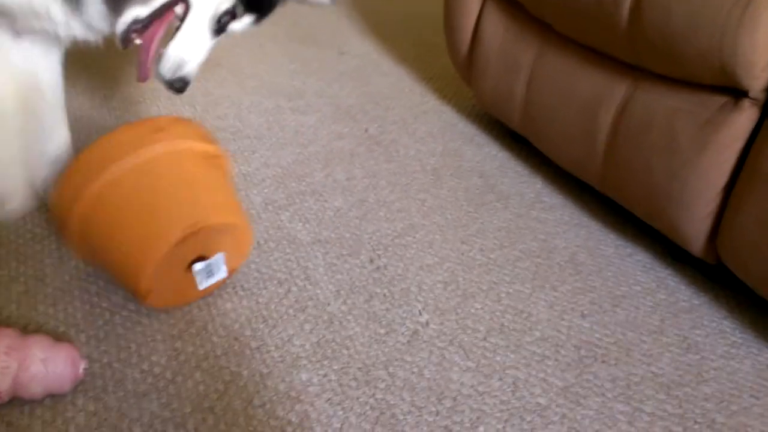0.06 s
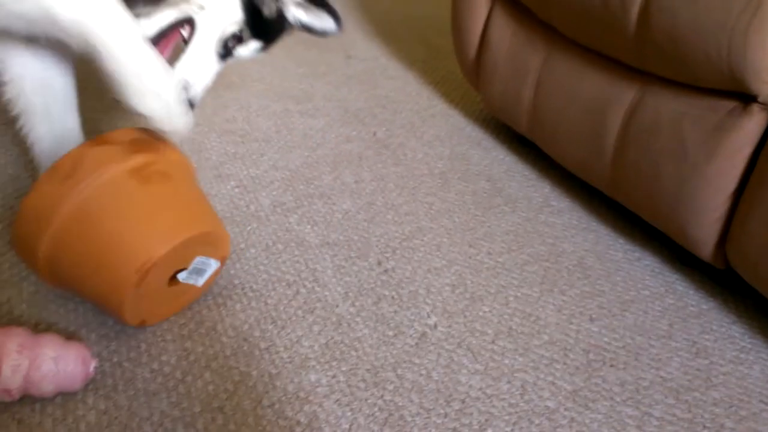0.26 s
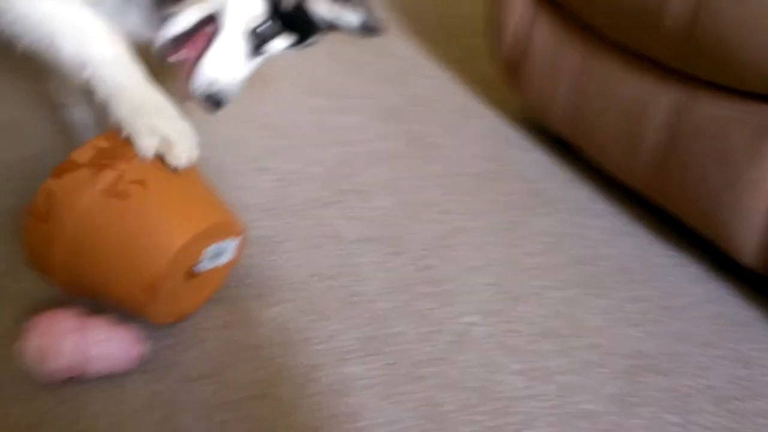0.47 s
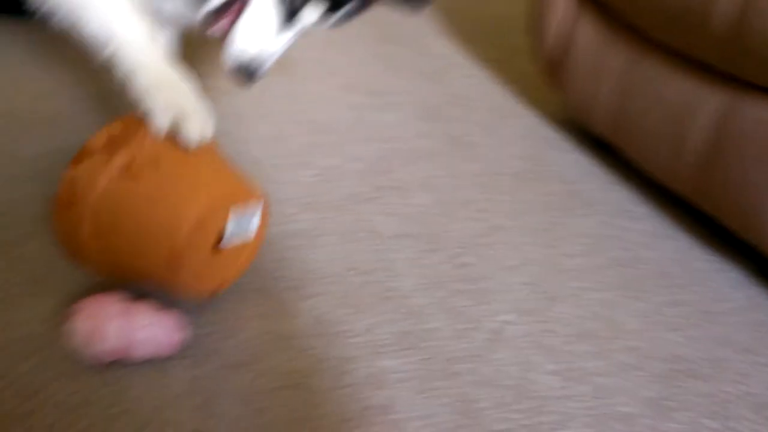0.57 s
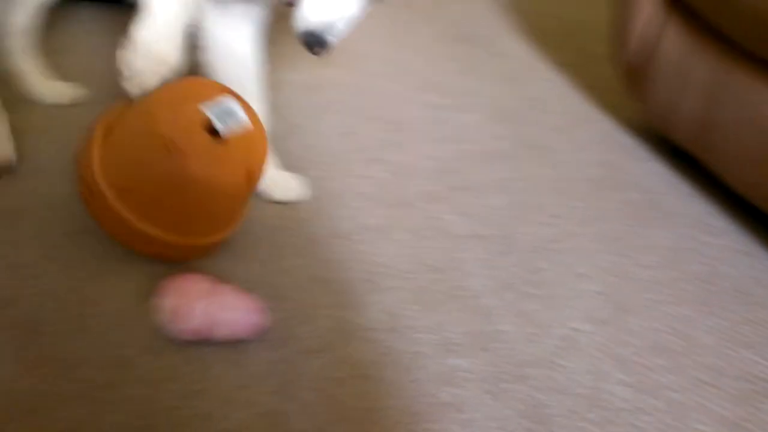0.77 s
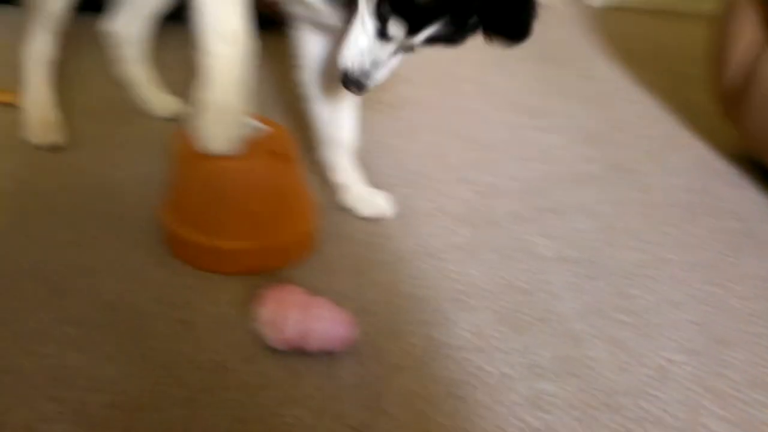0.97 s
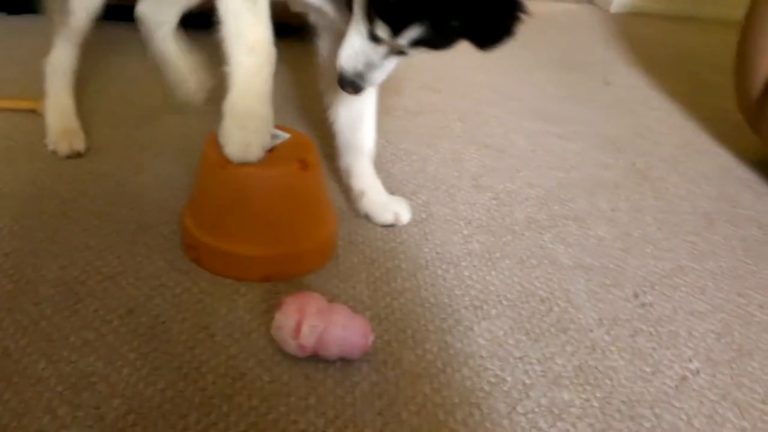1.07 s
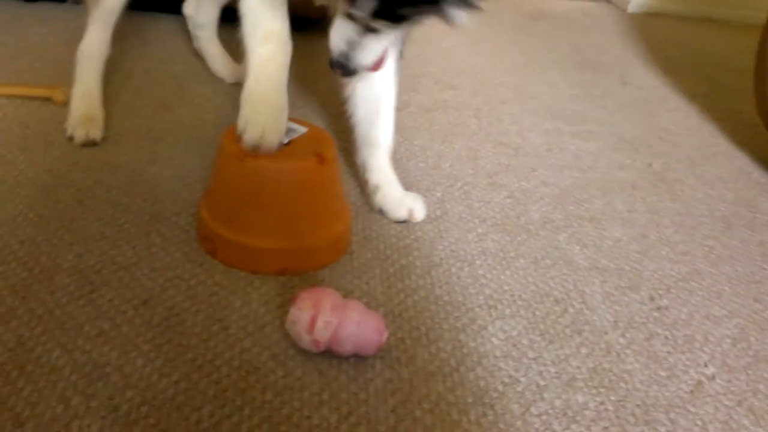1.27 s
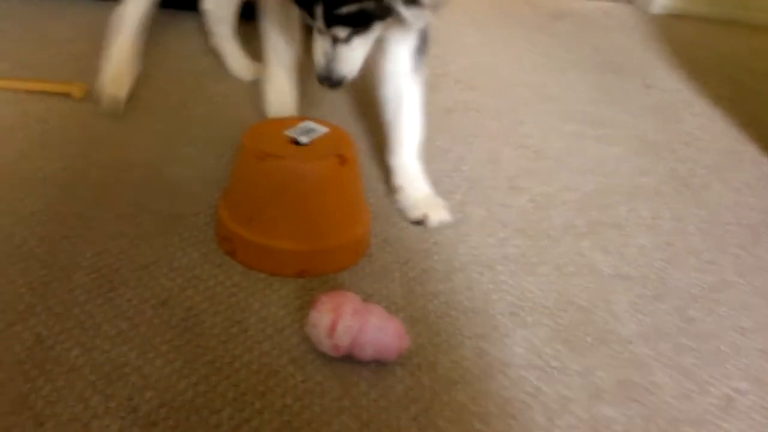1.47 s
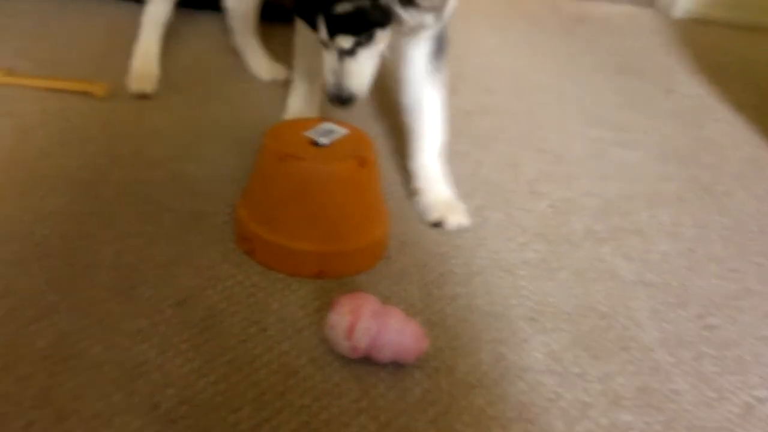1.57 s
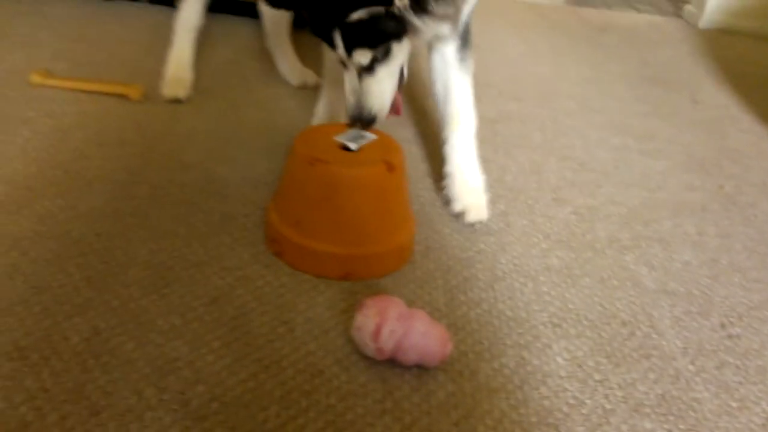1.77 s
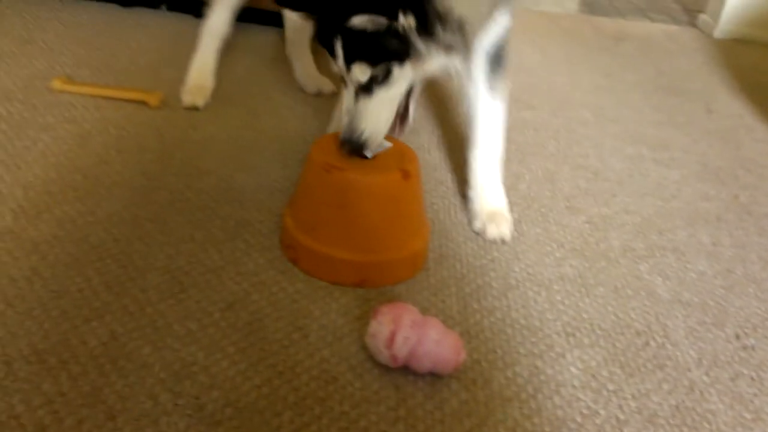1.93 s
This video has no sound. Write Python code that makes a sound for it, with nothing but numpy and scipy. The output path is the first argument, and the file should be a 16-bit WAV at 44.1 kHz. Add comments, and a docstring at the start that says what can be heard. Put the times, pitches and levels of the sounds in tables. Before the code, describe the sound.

Sharp clinks and gritty scrapes come from a terracotta pot as a dog paws it around a carpeted living room. The pot rolls with a faint hollow rumble, thuds onto its rim, then takes one more scratch and slides.

```python
"""Living room: a dog paws a terracotta flowerpot across the carpet.
Claws click and scrape (stick-slip) on the clay, which rings briefly. The pile hisses against
the pot and drives a hollow rumble as it rolls. The pot drops onto its rim with a thud and is
scratched once more. Low room noise with faint hums lies underneath."""
import sys
import numpy as np
from scipy import signal
from scipy.fft import rfft, irfft, next_fast_len
from scipy.io import wavfile
from scipy.ndimage import uniform_filter1d

SR = 44100
rng = np.random.default_rng(int(sys.argv[2]) if len(sys.argv) > 2 else 0)


def to_wav(s):
    """Save 16-bit WAV."""
    ch = np.atleast_2d(s).T  # columns
    pcm = np.round(np.clip(ch, -1, 1) * 32767)  # PCM
    wavfile.write(sys.argv[1], SR, pcm.astype(np.int16))


N = 88200
T = np.arange(N) / SR
RING_T = T[:SR // 2]
LANDS_S = 0.9415   # pot on its side before, on its rim after


def from_db(db):
    """Decibels to gain."""
    return 10 ** (np.asarray(db) / 20)


def unit_energy(x):
    """Scale to a mean energy of 1 per channel."""
    return x / np.sqrt(np.mean(np.sum(x ** 2, axis=-1)) + 1e-20)


def unit_rms(x):
    """Scale to an rms of 1."""
    return x / np.sqrt(np.mean(x ** 2) + 1e-20)


def decay(t60_s):
    """Exponential decay over RING_T."""
    return np.exp(-np.log(1000) * RING_T / t60_s)


def at_hz(points, hz):
    """Read a table on a log-frequency axis."""
    f, value = np.transpose(points)
    return np.interp(np.log(np.maximum(hz, 1)), np.log(f), value)


def coloured(x, points):
    """Minimum-phase filter through points of f/Hz, level/dB."""
    n = x.shape[-1]
    size = 2 * next_fast_len(n)
    gain = from_db(at_hz(points, np.fft.rfftfreq(size, 1 / SR)))
    cepstrum = irfft(np.log(gain))
    cepstrum[1:size // 2] *= 2
    cepstrum[size // 2 + 1:] = 0
    return irfft(rfft(x, size) * np.exp(rfft(cepstrum)))[..., :n]


def stereo_pair(mid, side, correlation):
    """Left and right from two independent noises."""
    return np.sqrt(1 + correlation) * mid + np.sqrt(1 - correlation) * side * np.array([[1], [-1]])


def pan_gains(db):
    """Gains for a left-minus-right level."""
    return from_db(np.array([[db], [-db]]) / 2)


def stereo_noise(spectrum):
    """Shaped noise of rms 1, mono at 100-300 Hz."""
    # left-right likeness: f/Hz, correlation
    likeness = [(30, 0.42), (100, 1), (300, 1), (700, 0.81), (1500, 0.37), (8000, 0.64)]
    hz = np.fft.rfftfreq(N, 1 / SR)
    white = stereo_pair(*rfft(rng.standard_normal((2, N))), at_hz(likeness, hz))
    return unit_rms(irfft(white * from_db(at_hz(spectrum, hz)), N))


def mix_in(out, start_s, x):
    """Add x to out from start_s."""
    i = int(start_s * SR)
    out[..., i:i + x.shape[-1]] += x[..., :max(N - i, 0)]


def room_noise():
    """Low steady noise; faint hums swell and fade."""
    # noise spectrum: f/Hz, level/dB
    spectrum = [(25, -10.5), (60, -39), (120, 1), (250, 2), (400, -2.5), (600, -6.5), (900, -7.5),
                (1400, -15), (2800, -25.5), (5000, -19), (10500, -32.5)]
    # room tones: f/Hz, peak level/dB, peak t/s, 1/e half-width/s
    hums = [(117.3, -55.5, 1.0, 3.7), (562, -53, 1.23, 0.68)]
    hum = 0
    for hz, db, peak_s, width_s in hums:
        tone = np.sqrt(2) * np.sin(2 * np.pi * (hz * T + rng.random()))
        hum += from_db(db) * tone * np.exp(-((T - peak_s) / width_s) ** 2)
    return from_db(-45.5) * stereo_noise(spectrum) + hum


def room_echo(x, t60_s=0.2, delay_s=0.013):
    """Short diffuse echo of a carpeted room."""
    tail = unit_energy(rng.standard_normal((2, len(RING_T))) * decay(t60_s) * (RING_T > delay_s))
    return from_db(-11) * signal.fftconvolve(x.mean(axis=0)[None], tail, axes=1)[:, :N]


def brushing():
    """Soft hiss of the pile against the moving pot."""
    # hiss envelope: t/s, level/dB
    envelope = [(0, -49), (.2, -50.5), (.34, -52), (.5, -46.5), (.66, -47.5), (.82, -45), (.95, -49.5),
                (1.08, -59), (1.27, -67), (1.40, -45.5), (1.50, -46), (1.58, -58), (1.70, -48), (1.80, -54),
                (1.87, -50), (1.93, -59.5), (2.0, -57.5)]
    # hiss spectrum: f/Hz, level/dB
    spectrum = [(300, -15), (550, 3), (900, 0.5), (1300, -12), (1800, -7.5), (3000, -13.5), (5000, -6.5),
                (7000, -18), (10500, -26)]
    return from_db(np.interp(T, *np.transpose(envelope))) * stereo_noise(spectrum)


def rolling():
    """The pile drives the pot's hollow resonances as it rolls and slides."""
    # rumble envelope: t/s, level/dB
    envelope = [(0, -41.5), (.12, -35.5), (.22, -35.5), (.31, -36.5), (.35, -54), (.41, -42), (.45, -35.5),
                (.53, -39.5), (.63, -31), (.70, -50), (.84, -40), (.93, -40.5), (.975, -31), (1.035, -32),
                (1.075, -49), (1.22, -53), (1.29, -52.5), (1.35, -49), (1.50, -39), (1.56, -48),
                (1.615, -44.5), (1.645, -32.5), (1.75, -33), (1.815, -43.5), (1.87, -37.5), (2.0, -50)]
    # hollow resonances: f/Hz, half-width per filter pass/Hz, level on side/dB, level on rim/dB
    resonances = [(122, 31, -13, -12.5), (180.7, 17, -7, -9), (222, 10.7, 0, -3), (249, 5.8, -3.5, -0.5),
                  (279, 55, -8, -11.5)]
    rumble = 0
    for hz, half_width_hz, side_db, rim_db in resonances:
        b, a = signal.iirpeak(hz, hz / (2 * half_width_hz), fs=SR)
        drive = stereo_pair(*rng.standard_normal((2, N + SR // 2)), correlation=0.98)
        band = signal.lfilter(b, a, signal.lfilter(b, a, drive))[:, -N:]
        rumble += unit_rms(band) * from_db(np.where(T < LANDS_S, side_db, rim_db))
    running_rms = np.sqrt(uniform_filter1d(np.mean(rumble ** 2, axis=0), size=SR // 20) + 1e-12)
    return from_db(np.interp(T, *np.transpose(envelope))) * rumble / running_rms


def thud(band_hz=(128.4, 520)):
    """The rim lands on the carpet: soft pushes into the low modes of cavity and floor."""
    # rim contacts: t/s, level/dB, length/s
    contacts = [(0.939, -21.5, 0.0023), (0.949, -12, 0.0034)]
    # cavity and floor modes: f/Hz, level/dB, t60/s
    modes = [(83.5, -14.5, 0.48), (119, -8.5, 0.15), (173.6, -14.5, 0.37), (208.7, -2.5, 0.086),
             (232, -10, 0.14), (325, -3, 0.084), (387, -1.5, 0.037)]
    out = np.zeros(N)
    body = sum(from_db(db) * np.sin(2 * np.pi * hz * RING_T) * decay(t60_s) for hz, db, t60_s in modes)
    for start_s, db, length_s in contacts:
        push = np.sin(np.pi * np.minimum(RING_T / length_s, 1)) ** 2
        mix_in(out, start_s, from_db(db) * signal.fftconvolve(body, push / push.sum())[:len(RING_T)])
    return signal.sosfilt(signal.butter(3, band_hz, "band", fs=SR, output="sos"), out + 1e-18)


def mode_crowd(t60_s):
    """The clay's weak, close modes, as one decaying noise."""
    # crowd spectrum: f/Hz, level/dB
    spectrum = [(800, -16), (1250, -39.5), (1900, -12.5), (2600, -7.5), (3100, -13), (3700, -9.5),
                (4400, 2), (5300, 1.5), (6300, -4), (7300, -0.5), (8100, -8.5), (10500, -15.5)]
    white = stereo_pair(*rng.standard_normal((2, len(RING_T))), correlation=0.58)
    return unit_energy(coloured(white * decay(t60_s), spectrum))


def pot(force, start_s, low_db, top_db, ring_db, favoured_hz):
    """Pot's response to a force: a dry crack, then modes mixed anew at each contact point."""
    # strong modes, f/Hz: (level on side/dB, level on rim/dB)
    modes = {1557: (-6, -4), 1625: (-13, -18), 2150: (-11, -20), 2342: (-22, -5), 2560: (-8, -16),
             2700: (-10, -6), 3325: (-12, -20), 3640: (-4, -14), 3685: (-12, -5), 4285: (-6, -3),
             4413: (-1, 0), 4540: (-7, -2), 4655: (0, -12), 5076: (0, -2), 5245: (-2, -5), 5318: (-1, -2),
             5432: (-7, -2), 5590: (-6, -5), 5786: (-4, -14), 6640: (-17, -4), 7170: (-8, -16),
             7325: (-6, -13), 8330: (-15, -12), 9550: (-24, -13)}
    # mode damping: f/Hz, t60/s
    damping = [(1500, .19), (5000, .17), (10000, .13)]
    modes_db, spread_db, pan_spread_db, favoured_db, crowd_db = -5, 2, 3, -6, -5
    nearest_hz = min(modes, key=lambda hz: abs(hz - favoured_hz))
    ring = 0
    for hz, (side_db, rim_db) in modes.items():
        strength, pan, turn, skew = rng.standard_normal(4)
        phase = np.pi * turn + .5 * skew * np.array([[1], [-1]])
        wave = np.sin(2 * np.pi * hz * RING_T + phase) * decay(at_hz(damping, hz))
        wave = unit_energy(wave * pan_gains(pan_spread_db * pan))
        pose_db = side_db if start_s < LANDS_S else rim_db
        gain = from_db(modes_db + pose_db + spread_db * strength) / 2
        ring += wave * np.hypot(gain, from_db(favoured_db) * (hz == nearest_hz))
    crack = mode_crowd(t60_s=.032)
    ring += from_db(crowd_db) * mode_crowd(t60_s=.19)
    body = crack + from_db(ring_db) * ring
    sound = signal.fftconvolve(body, force[None], axes=1)[:, :len(RING_T)]
    return coloured(sound, [(2700, low_db), (5070, 0), (7770, top_db)])


def stick_slip(envelope, slips_per_s=2200, spread_db=4.5):
    """Uneven force pulses of a claw on gritty clay."""
    n = len(envelope)
    sizes = from_db(spread_db * np.minimum(rng.exponential(1, n), 4)) * rng.choice([-1, 1], n)
    return unit_energy(envelope * sizes * (rng.random(n) < slips_per_s / SR))


def claws():
    """Claws strike and drag over the pot, which lies to the right."""
    # strikes: t/s, level/dB, low/dB, top/dB, ring/dB, build-up/s, f favoured by the spot/Hz
    clinks = [(0.2465, -22, -14, 1, -4, .001, 5318), (0.2555, -17, -37, -0.5, -20, 0.00046, 5590),
              (0.2595, -23, -5.5, 2.5, 4.5, .002, 3685), (0.3888, -14.5, -6, 6, 0, .003, 7325),
              (0.4085, -12, -2.5, -0.5, -2, 0.0075, 5076), (0.4790, -29.5, 9, -2, -7, 0.0031, 2560),
              (0.5470, -30.5, 2.5, -5.5, 6, 0.0067, 4285), (0.6718, -27, 9, -14, 3.5, 0.00086, 2150),
              (0.6851, -14, 7, 0, 6, 0.0016, 7325), (0.6885, -6, -5, -19, -9, .0012, 7170),
              (0.6955, -12, -18, -24, -6, 0.00038, 4413), (0.7178, -2, -5, -15.5, -4.5, .0015, 4655),
              (0.73, -25, -1, -13, 4, 0.00393, 1557), (0.7966, -13.5, -27, -5, -16, .004, 5076),
              (0.815, -23, 4.5, 3, -5, 0.0035, 5076), (0.8440, -17.5, -6, 3, 0.5, 0.0048, 3325),
              (0.8955, -12, -7, -8.5, -11, 0.0056, 5590), (0.947, -11.5, 0, 2, 1.5, .003, 5432),
              (0.951, -6, -14, -8, -2, .002, 4413), (0.9580, -11.5, 3, -12, -0.5, .002, 1557),
              (0.9883, -19, 7.5, -3, -1, .002, 6640), (1.193, -47, 9.5, 10, -17, 0.0022, 4540),
              (1.44, -12, -0.5, -0.5, -5.5, 0.0024, 3685), (1.856, -40.5, 8, 9, -7, .001, 8330)]
    # drags: t/s, length/s, level/dB, low/dB, top/dB, f favoured by the spot/Hz
    scrapes = [(0.23, 0.049, -25, -17, -0.5, 5245), (0.393, 0.046, -15.5, -7, -2, 4413),
               (0.422, 0.100, -28, 1.5, 5.5, 4413), (0.521, 0.067, -31.5, 4, 5, 7325),
               (0.592, 0.13, -29, 3.5, 5.5, 5245), (0.642, 0.041, -26.5, 5.5, 1, 2150),
               (0.708, 0.01, -18.5, -12, 3.5, 7170), (0.728, 0.15, -12.5, -5, -7.5, 4655),
               (0.782, 0.045, -13, -14.5, -7.5, 5076), (0.83, 0.037, -17, -2.5, 2.5, 2700),
               (0.874, 0.053, -18, -3, 1, 4655), (0.975, 0.069, -24, -0.5, 4.5, 4285),
               (1.354, 0.093, -21.5, -2.5, 7, 4540), (1.442, 0.074, -35.5, -7, 7.5, 8330)]
    # pot's stereo balance: f/Hz, left minus right/dB
    balance = [(1500, -1.5), (2800, -7), (5000, -7), (9000, -1)]
    chatter_s, chatter_db = 0.0032, 4   # a claw skips as it lands
    low_cut_hz = 1380   # the wall radiates little below its first mode
    out = np.zeros((2, N))
    for start_s, db, low_db, top_db, ring_db, build_s, favoured_hz in clinks:
        grip = np.minimum(RING_T / build_s, 1) * np.exp(-np.maximum(RING_T - build_s, 0) / chatter_s)
        force = from_db(chatter_db) * stick_slip(grip)
        force[int(build_s * SR / 2)] += 1   # the impact
        clink = pot(unit_energy(force), start_s, low_db, top_db, ring_db, favoured_hz)
        mix_in(out, start_s, from_db(db) * clink)
    for start_s, length_s, db, low_db, top_db, favoured_hz in scrapes:
        stroke = np.interp(RING_T / length_s, [0, 0.34, 1], [0, 1, 0])
        scrape = pot(stick_slip(stroke), start_s, low_db, top_db, ring_db=3, favoured_hz=favoured_hz)
        mix_in(out, start_s, from_db(db) * scrape)
    out = signal.sosfilt(signal.butter(4, low_cut_hz, "high", fs=SR, output="sos"), out + 1e-18)
    left = coloured(out[0], [(hz, db / 2) for hz, db in balance])
    right = coloured(out[1], [(hz, -db / 2) for hz, db in balance])
    return from_db(15.5) * np.array([left, right])


def scene():
    """Claws with their echo, the pot on the carpet, room noise."""
    pawing = claws()
    return pawing + room_echo(pawing) + thud() + rolling() + brushing() + room_noise()


def record(dry):
    """Steep low-pass."""
    cutoff_hz = 10480
    return signal.sosfilt(signal.ellip(12, .2, 75, cutoff_hz, fs=SR, output="sos"), dry)


dry = scene()
out = record(dry)
to_wav(out)
```